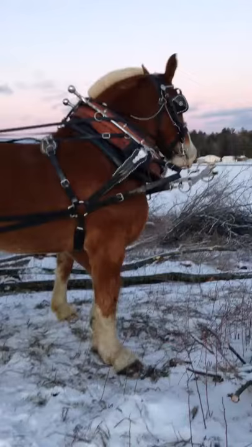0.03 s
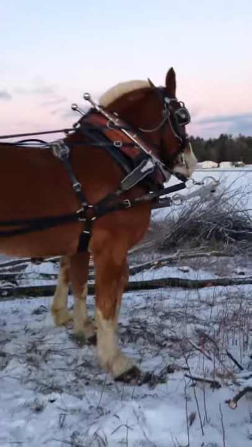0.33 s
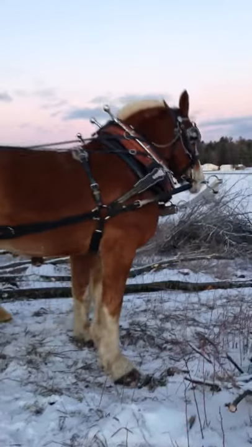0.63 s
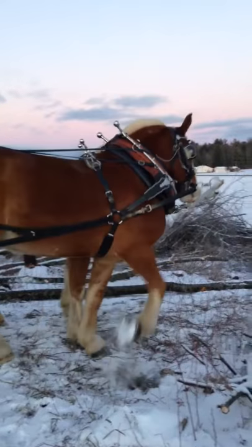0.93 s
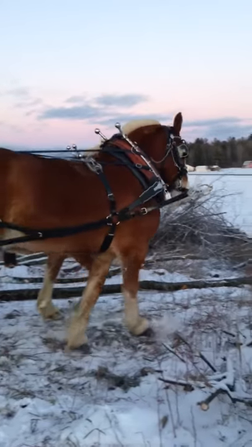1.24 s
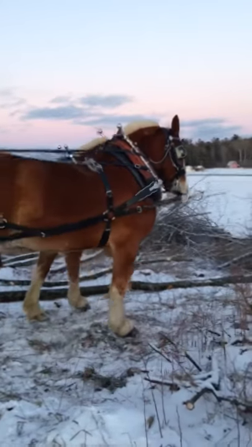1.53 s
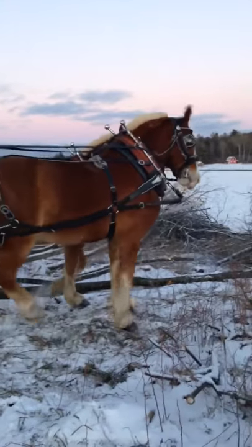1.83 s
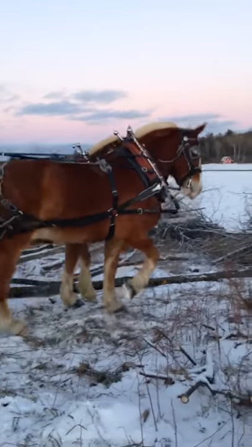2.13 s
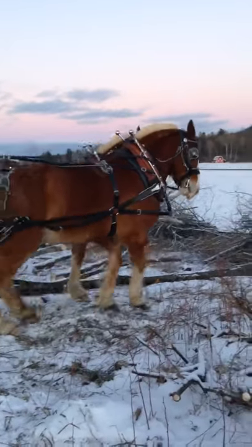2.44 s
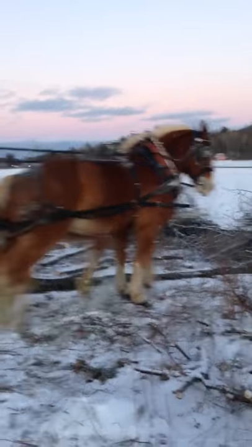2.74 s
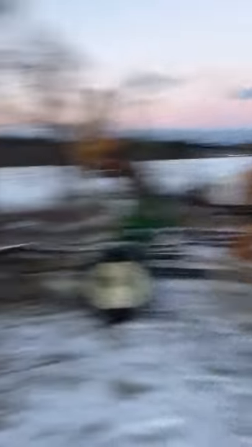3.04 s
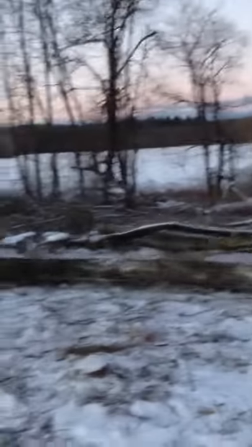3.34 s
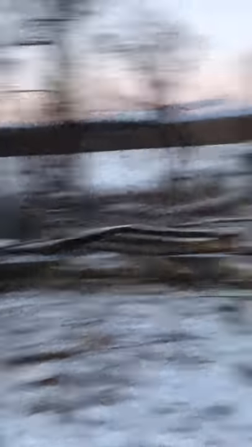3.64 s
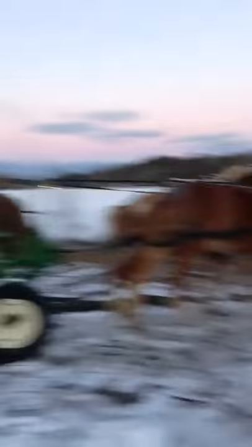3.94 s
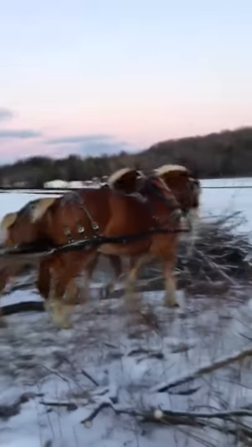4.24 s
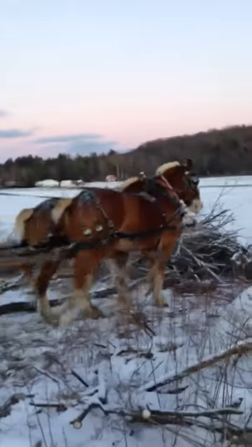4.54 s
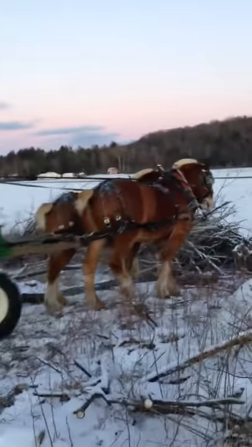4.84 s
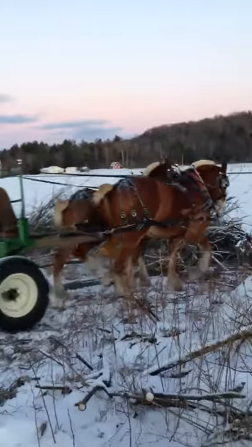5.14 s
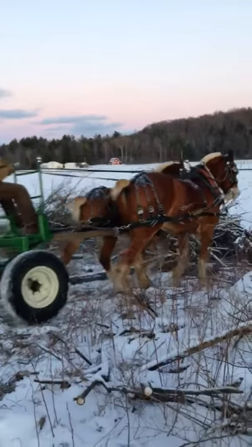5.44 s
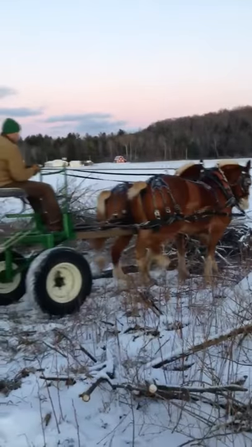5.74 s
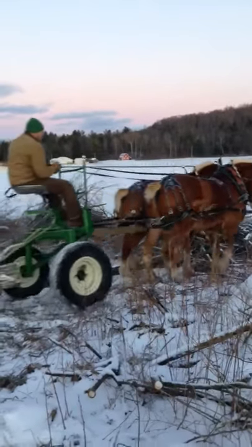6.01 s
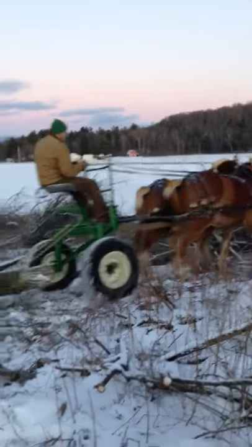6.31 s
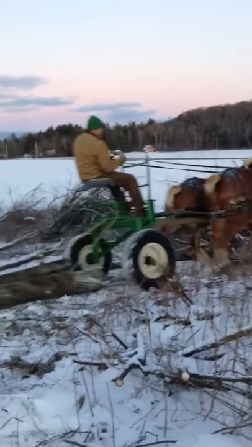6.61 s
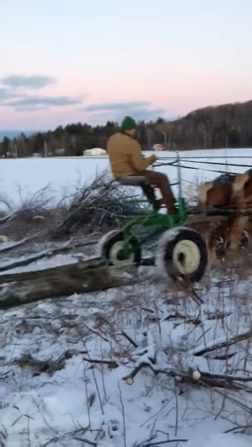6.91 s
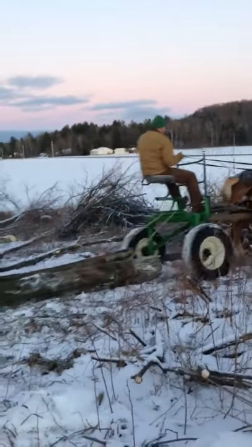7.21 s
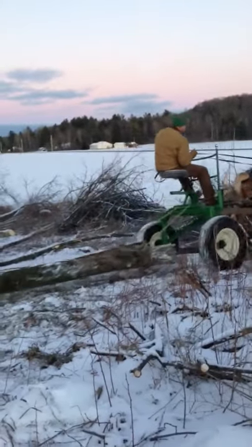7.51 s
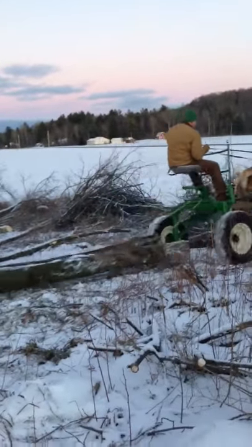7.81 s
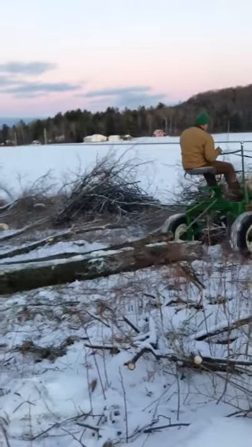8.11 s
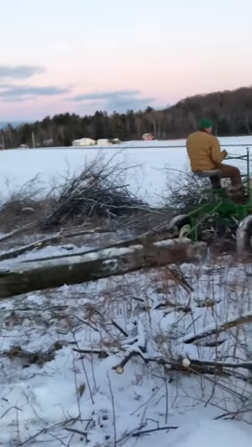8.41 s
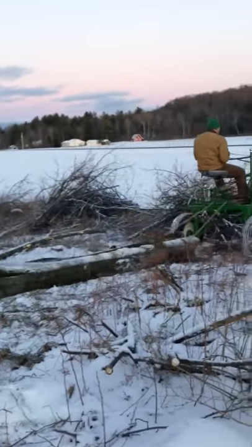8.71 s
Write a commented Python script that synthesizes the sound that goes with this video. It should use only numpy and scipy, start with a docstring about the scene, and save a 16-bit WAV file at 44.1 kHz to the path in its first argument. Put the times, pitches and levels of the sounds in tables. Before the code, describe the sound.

Horses crunch through snow with rattling harness chains, while their cart and log rumble, scrape and crack through dry brush.

```python
"""A team of draught horses walks past in a snowy field, pulling a wheeled cart with a log in tow.
From the start, strides jerk the harness chains taut, steel links rattle on and hooves crunch crusted snow.
From 2 s the load rumbles over frozen ground; near 3.3 s the log scrapes close by with a thin sizzle.
The chains rattle hardest near 4.7 s. Then rumble and rattle ease off, while hooves and wood thud
and twigs keep snapping under the load."""
import sys
import numpy as np
from scipy import signal
from scipy.fft import rfft, irfft, next_fast_len
from scipy.io import wavfile
from scipy.ndimage import uniform_filter1d

SR = 44100
rng = np.random.default_rng(int(sys.argv[2]) if len(sys.argv) > 2 else 0)


def dump(signal):
    """Clip the signal to [-1, 1] and save it as 16-bit WAV at the path in sys.argv[1]."""
    limited = np.clip(np.atleast_2d(signal).T, -1, 1)
    pcm = np.round(limited * 32767).astype(np.int16)
    wavfile.write(sys.argv[1], SR, pcm)


N = 390726
TIME = np.arange(N) / SR

# Modes of a steel link. Each row: frequency in Hz, level in dB, t60 in seconds, spread between links in Hz.
LINK_MODES = [(5072, -4, .16, 45), (5185, -5.5, .1, 110), (5545, -10, .14, 35), (8520, -21, .1, 70),
              (10020, 1, .2, 70), (10912, -6.5, .2, 50), (13465, -7.5, .2, 45), (13850, -10, .16, 120)]
# Chain swings. Each row: time in seconds, rattle level in dB, rattle hold in seconds, jerk level in dB,
# low modes re high modes in dB.
CHAIN_SWINGS = [(0.19, -50.5, 0.054, -48, 4), (0.3, -51, 0.017, -37, 0), (0.36, -33, 0.055, -48, -6.5),
                (0.738, -44.5, 0.011, -37, 0.5), (0.84, -39, 0.026, -29.5, -1), (1.03, -39, .035, -43, 5),
                (1.35, -37, 0.035, -46, -2), (1.459, -33, 0.06, -23, -2.5), (1.602, -32, 0.042, -22, -2.5),
                (1.788, -26, 0.035, -28, -4), (1.85, -28, 0.056, -40, -7), (1.984, -29.5, .05, -27, -0.5),
                (2.174, -25, .01, -24, -3), (2.209, -26, 0.0082, -11.5, -6.5), (2.351, -36, 0.052, -49, 0),
                (2.437, -33.5, 0.152, -23.5, -3.5), (2.619, -30, 0.019, -36, -0.5),
                (2.712, -25, 0.057, -18, -3), (2.852, -27, 0.0166, -27, -5.5), (3.05, -37.5, 0.085, -51, 2),
                (3.21, -32, .29, -33, 4.5), (3.632, -28.5, .06, -39, 0), (3.83, -38, .028, -42, 1),
                (4.44, -37, 0.23, -32, 0), (4.585, -25.5, .1, -27, -2), (4.66, -24, .02, -21, -4),
                (4.693, -17, 0.015, -27, -7), (4.81, -27.5, 0.018, -20, -1), (4.835, -23.5, .008, -21, -5),
                (4.914, -33, 0.0118, -30, -2), (5.188, -28.5, 0.058, -29, -2.5),
                (5.249, -23, 0.015, -18, -5), (5.68, -43, 0.032, -35, 4), (5.998, -35, 0.0672, -30, -0.5),
                (7.02, -44, 0.061, -45, -1), (7.095, -40, .04, -34, -2), (7.27, -43, 0.016, -45, 0),
                (7.391, -46, .09, -47, 5), (8.77, -42.5, 0.089, -31.5, 1)]
LOW_MODES_BELOW_HZ = 7000


def from_db(db):
    """Decibels to gain."""
    return 10 ** (np.asarray(db) / 20)


def rms_one(x):
    """Scale to unit power."""
    return x / np.sqrt(np.mean(x ** 2) + 1e-20)


def as_blow(x):
    """Scale a short sound to the energy of 5 ms at unit power."""
    return x / np.sqrt(np.sum(x ** 2) / (.005 * SR) + 1e-20)


def even(x, span_s):
    """Hold short-term power near 1, keeping the fine grain."""
    power = uniform_filter1d(x ** 2, int(span_s * SR))
    power = uniform_filter1d(np.abs(power), int(span_s * SR / 2))
    return x / np.sqrt(power + np.mean(x ** 2) / 1000)


def gains(rows):
    """Rows of (seconds, dB, ..) to one gain curve per dB column."""
    times_s, *columns = np.transpose(rows)
    return [from_db(np.interp(TIME, times_s, db)) for db in columns]


def add(out, at_s, sound):
    """Mix a sound in at a time."""
    at = max(round(at_s * SR), 0)
    out[at:at + len(sound)] += sound[:N - at]


def swells(events, attack_s, release_s):
    """Power curve of (time s, hold s, dB) events: each rises up to its time, holds, decays."""
    power, t = np.zeros(N), TIME[:SR]
    for at_s, hold_s, db in events:
        shape = np.minimum(t / attack_s, 1) * np.exp(-np.maximum(t - attack_s - hold_s, 0) / release_s)
        add(power, at_s - attack_s, (from_db(db) * shape) ** 2)
    return power


def drift(per_s):
    """Slow random curve, unit RMS."""
    knots = rng.standard_normal(4000)
    return rms_one(np.interp(TIME * per_s, np.arange(len(knots)), knots))


def grains(per_s, spread_db, size=N):
    """Random tiny impacts: many weak, a few strong."""
    strength = from_db(spread_db * np.minimum(rng.exponential(1, size), 5))
    return (rng.random(size) < per_s / SR) * strength * rng.choice([-1, 1], size)


def colour(x, spectrum):
    """Minimum-phase filter through (Hz, dB) points."""
    hz, db = np.transpose(spectrum)
    size = 2 * next_fast_len(len(x) // 2 + 1024)
    grid_hz = np.maximum(np.fft.rfftfreq(size, 1 / SR), 1)
    magnitude = from_db(np.interp(np.log(grid_hz), np.log(hz), db))
    cepstrum = irfft(np.log(magnitude))
    cepstrum[1:size // 2] *= 2
    cepstrum[size // 2 + 1:] = 0
    return irfft(rfft(x, size) * np.exp(rfft(cepstrum)))[:len(x)]


def low_cut(x, hz):
    """Second-order high-pass."""
    return signal.sosfilt(signal.butter(2, hz, "high", fs=SR, output="sos"), x)


def resonance(x, hz, *widths_hz):
    """Band-passes in series, one per width, unit peak gain."""
    for width_hz in widths_hz:
        q = hz / min(width_hz, SR / 3)
        x = signal.lfilter(*signal.iirpeak(hz, q, fs=SR), x + 1e-18)
    return x


def ring(clicks, hz, t60_s):
    """Each click starts a decaying sine of its own height."""
    r, w = from_db(-60 / (t60_s * SR)), 2 * np.pi * hz / SR
    return signal.lfilter([0, np.sin(w)], [1, -2 * r * np.cos(w), r * r], clicks + 1e-18)


def field(x, scatter_db=-15, rise_s=.0017, decay_s=.0081):
    """Brush and snow scatter a short, dull tail."""
    t = TIME[:SR // 4]
    tail = resonance(rng.standard_normal(len(t)), 980, 16000)
    tail = tail * np.exp(-t / decay_s) * (1 - np.exp(-t / rise_s))
    tail /= np.sqrt(np.sum(tail ** 2))
    return x + from_db(scatter_db) * signal.oaconvolve(x, tail)[:N]


def with_steps(steady, layer):
    """A horse treads down and the load surges: the layer's gain swells at each step."""
    # Each row: time in seconds, hold in seconds, then rumble, crush and crackle levels in dB.
    steps = [(0.263, 0.12, -56, -49.5, -50), (0.584, 0.092, -58, -52.5, -42), (0.877, 0.13, -54, -39, -39),
             (1.446, 0.011, -59, -37, -32), (1.602, 0.021, -50, -36, -44), (1.943, 0.1, -34.5, -33.5, -35),
             (2.62, 0.12, -28.5, -55, -54), (3.205, 0.17, -29.5, -47, -27.5), (4.077, 0.089, -28, -41, -60),
             (4.217, 0.17, -27.5, -39, -56), (4.47, 0.075, -35, -48, -37), (4.639, 0.028, -39, -39, -31),
             (4.835, 0.051, -37, -49, -32), (5.464, 0.036, -41.5, -42.5, -42),
             (5.904, 0.17, -35.5, -52, -37.5), (6.24, 0.18, -36.5, -40, -37.5),
             (6.625, 0.15, -38, -38, -37), (6.948, 0.058, -45, -43, -35), (8.655, 0.069, -34, -55, -49)]
    column = ("rumble", "crush", "crackle").index(layer)
    events = [(at_s, hold_s, levels_db[column]) for at_s, hold_s, *levels_db in steps]
    return np.sqrt(steady ** 2 + swells(events, attack_s=.028, release_s=.015))


def rumble(uneven_db=2.3):
    """Dense bumps on frozen ground shake the load's low resonances; uneven ground varies the level."""
    # Each row: time in seconds, level in dB.
    drag_curve = [(0.25, -60), (0.58, -69), (0.99, -52.5), (1.35, -60.5), (2.02, -37), (2.84, -26),
                  (3.19, -30), (3.62, -37.5), (4.22, -28), (4.7, -40), (5.2, -41), (5.38, -43.5),
                  (5.76, -44), (6.24, -39), (6.8, -43.5), (7.45, -46.5), (7.92, -47), (8.16, -41),
                  (8.51, -46.5), (8.85, -40)]
    # Each row: frequency in Hz, width in Hz, level in dB.
    load_modes = [(188, 25, 3.5), (234.3, 39, 7.5), (300, 40, 0.5)]
    level = with_steps(gains(drag_curve)[0], "rumble")
    out = 0
    for hz, width_hz, db in load_modes:
        bumps = grains(1500, spread_db=2)
        out += from_db(db) * rms_one(resonance(bumps, hz, width_hz, 2.6 * width_hz))
    return level * from_db(1.5 + uneven_db * drift(per_s=22)) * even(out, span_s=.16)


def clods(per_s=330, t60_cycles=12, count=26):
    """Frozen lumps and sticks knock together, each at its own pitch."""
    pitches_hz = np.geomspace(380, 2300, count) * rng.uniform(.97, 1.03, count)
    return rms_one(sum(ring(grains(per_s / count, spread_db=3.5), hz, t60_cycles / hz) * hz ** .9
                       for hz in pitches_hz))


def ticks(per_s=240, t60_cycles=7, count=14):
    """Dry stalks break singly, each with a very short ring."""
    return rms_one(sum(ring(grains(per_s / count, spread_db=3.6), hz, t60_cycles / hz)
                       for hz in np.geomspace(2800, 11000, count)))


def brush():
    """Under wheels and log, snow packs and stalks break in clumps of fractures over a sliding hiss."""
    # Each row: time in seconds, snow crush in dB, stalk crackle in dB.
    slide_curve = [(0.15, -56, -51.5), (0.3, -54, -57), (0.5, -55, -52.5), (0.8, -56.5, -55),
                   (1.1, -52.5, -47), (1.35, -49, -50), (1.47, -46.5, -39), (1.61, -50.5, -42),
                   (1.97, -46, -45), (2.12, -37.5, -40), (2.55, -39, -39.5), (3.19, -30.5, -33.5),
                   (3.31, -32, -30.5), (3.64, -37, -38.5), (3.95, -40.5, -41.5), (4.38, -37, -38.5),
                   (5.12, -41, -36.5), (5.29, -43.5, -40.5), (5.65, -41.5, -44), (6.22, -40, -42.5),
                   (6.53, -35.5, -38), (7.2, -42.5, -37), (7.7, -43, -39.5), (7.85, -45, -47),
                   (8.09, -45.5, -49.5), (8.2, -41.5, -39.5), (8.54, -47, -43), (8.85, -41.5, -38.5)]
    # Spectra. Each row: frequency in Hz, density in dB.
    snow_spectrum = [(30, -31), (65, -40), (120, -3), (330, 3.5), (500, 0), (950, 1), (1500, -3),
                     (2200, -4), (4000, -15), (15000, -27)]
    stalk_spectrum = [(100, -83), (700, -42), (1500, 3), (2300, -2), (3600, 5.5), (5000, 3.5), (6500, 2),
                      (9000, 3.5), (12000, 0.5), (15000, -6)]
    crush_gain, crackle_gain = gains(slide_curve)
    crush_gain = from_db(1.2) * with_steps(crush_gain, "crush")
    crackle_gain = from_db(.5) * with_steps(from_db(2.5) * crackle_gain, "crackle")
    snow = rms_one(grains(2500 * from_db(4.4 * drift(per_s=70)), spread_db=1))
    stalks = rms_one(grains(3000 * from_db(7 * drift(per_s=90)), spread_db=2))
    crush = colour(snow + .5 * rng.standard_normal(N) + .26 * clods(), snow_spectrum)
    crackle = rms_one(colour(stalks + .7 * rng.standard_normal(N), stalk_spectrum)) + .5 * ticks()
    return crush_gain * even(crush, span_s=.3) + crackle_gain * even(crackle, span_s=.33)


def sizzle():
    """Narrow, very high tones swell and fade as the load passes closest."""
    # Each row: time in seconds, level in dB.
    sizzle_curve = [(3.0, -64), (3.12, -47), (3.23, -28), (3.32, -25), (3.42, -37), (3.5, -54), (3.6, -75)]
    # Each row: frequency in Hz, width in Hz, level in dB.
    bands = [(14100, 61, 1), (14400, 110, -3), (15230, 50, -13)]
    tones = sum(from_db(db) * rms_one(resonance(rng.standard_normal(N), hz, width_hz, 2 * width_hz))
                for hz, width_hz, db in bands)
    return gains(sizzle_curve)[0] * rms_one(tones)


def scrape():
    """Bark catches and slips on the ground; the log rasps."""
    # Each row: time in seconds, level in dB.
    rasp_curve = [(2.85, -70), (3.12, -36), (3.24, -25.5), (3.33, -22.5), (3.42, -25), (3.52, -33),
                  (3.75, -66)]
    # Each row: frequency in Hz, width in Hz, level in dB.
    wood_modes = [(1420, 240, -1.5), (2300, 800, 0), (3300, 900, 1)]
    slips = grains(1500, spread_db=1)
    rasp = sum(from_db(db) * rms_one(resonance(slips, hz, width_hz)) for hz, width_hz, db in wood_modes)
    return gains(rasp_curve)[0] * rms_one(rasp)


def thuds():
    """Heavy, soft blows of hooves and wood on frozen ground shake a low resonance."""
    # Each row: start in seconds, level in dB, pitch in Hz, decay in seconds.
    blows = [(0.1, -35.5, 201, 0.0054), (2.439, -27, 142, 0.014), (3.427, -16.5, 274, 0.0015),
             (4.041, -16, 226, 0.013), (4.858, -19.5, 320, 0.017), (5.12, -26.5, 200, 0.015),
             (5.472, -24, 252, 0.028), (6.02, -25.5, 245, .02), (6.217, -24.5, 393, 0.025),
             (6.31, -26, 215, 0.016), (6.621, -33, 182, 0.014), (6.765, -23.5, 404, 0.014),
             (6.972, -22, 345, 0.016), (7.155, -24, 345, 0.022), (7.74, -27.5, 173, 0.023),
             (7.802, -23, 343, 0.012), (7.973, -24, 317, 0.019), (8.647, -25, 265, 0.02)]
    out, t = np.zeros(N), TIME[:SR // 5]
    for start_s, db, hz, decay_s in blows:
        push = rng.standard_normal(len(t)) * np.exp(-t / decay_s)
        add(out, start_s, from_db(db - 1) * as_blow(resonance(push, hz, .25 * hz, 10 * hz)))
    return out


def crunches_and_scuffs(rise_s=.00047):
    """Short, dying gritty bursts: low crunches of snow crust and bright scuffs of the harness."""
    # Each row: start in seconds, level in dB, decay in seconds, pitch in Hz.
    bursts = [(0.868, -34, 0.01, 2450), (0.901, -25, 0.014, 4500), (0.974, -25.5, 0.012, 1870),
              (1.022, -31, 0.014, 880), (1.162, -28.5, 0.037, 7950), (1.451, -24.5, 0.0062, 2460),
              (1.596, -23, 0.007, 1707), (1.965, -22.5, 0.013, 3230), (2.186, -21.5, 0.034, 7500),
              (2.287, -21, 0.0091, 8600), (2.617, -17, 0.012, 8320), (2.690, -18.5, 0.0057, 7495),
              (3.167, -19, 0.012, 670), (4.042, -21, .008, 800), (4.212, -29.5, 0.04, 3250),
              (4.439, -25, 0.016, 6400), (4.646, -26, 0.018, 7500), (4.922, -32, .016, 950),
              (5.156, -20, 0.0027, 1540), (5.472, -20.5, 0.0025, 4160), (5.652, -29.5, .016, 950),
              (5.744, -31.5, .008, 1200), (5.923, -19, 0.035, 2930), (6.432, -27.5, 0.0099, 750),
              (6.657, -29, .008, 1100), (6.683, -25, 0.0095, 1200), (6.752, -29, 0.015, 1040),
              (7.404, -31, 0.12, 2030), (8.643, -21, 0.012, 990), (8.685, -20, 0.01, 1480)]
    out, t = np.zeros(N), TIME[:SR // 4]
    for start_s, db, decay_s, hz in bursts:
        grit = grains(3000, spread_db=1.5, size=len(t))
        burst = rms_one(resonance(grit, hz, .71 * hz, 9.7 * hz))
        envelope = np.exp(-t / decay_s) * (1 - np.exp(-t / rise_s))
        add(out, start_s, from_db(db) * burst * envelope)
    return out


def twig_ring(force, hz, q, edge_db=-6):
    """A fracture rings at the twig's pitch; some raw force stays as a sharp edge."""
    ringing = as_blow(resonance(force, hz, hz / q, 2 * hz / q))
    return as_blow(ringing + from_db(edge_db) / q * force)


def snaps(crack_s=.00028, splinter_s=.0062, knock_s=.007, stick_width_hz=140):
    """A twig cracks, a few fibres follow, and the wood knocks and rings two octaves below the crack."""
    # Each row: start in seconds, crack level in dB, pitch in Hz, Q, splinters re crack in dB, knock in dB.
    twigs = [(.099, -20.5, 4070, 0.85, -1, -50), (.9565, -13, 9100, 1.1, -4, -58),
             (.181, -24.5, 3400, 1.9, 0, -44.5), (.233, -8.5, 3700, 0.32, -1, -31),
             (0.3355, -8.5, 4260, 2, -1, -35), (0.3419, -5, 3380, 1.3, -4, -30.5),
             (.653, -16, 3530, 0.71, -1, -25), (1.1785, -8, 8500, .7, 1, -51),
             (1.733, -14.5, 5400, 0.68, 2, -45), (2.505, -11.5, 9000, 2.4, 5, -42),
             (3.424, -10, 3110, 0.9, -10, -21.5), (3.871, -14, 4050, 0.4, -8, -30.5),
             (4.043, -10, 5800, 0.69, -1.5, -24.5), (4.412, -14.5, 13030, 2.5, 4, -38),
             (4.753, -10, 1770, 1.8, 0, -35), (4.79, -12, 4530, 0.56, 4, -25.5),
             (4.9446, -5.5, 4450, 3.9, -4, -29), (5.0578, -5.5, 4170, 3, -13, -48),
             (5.1117, -3.5, 6440, 1, -0.5, -27.5), (5.164, -12.5, 5070, 0.61, 4, -38),
             (5.815, -11, 4660, 1.3, -20, -49), (5.914, -2, 3430, 0.42, 6, -23.5),
             (6.377, -3.5, 4900, 1.4, -3.5, -26), (6.397, -10.5, 6630, 1, -1, -27),
             (6.4535, -12.5, 3500, 5.7, -3, -41), (6.481, -10.5, 4100, 0.75, -5, -33),
             (6.619, -9.5, 7000, 0.58, 3, -20.5), (6.7035, -7, 7000, 0.62, -12, -26),
             (6.9118, -6, 4900, 1.3, -2, -49), (6.977, -12, 3600, 1.2, -1, -29),
             (6.9875, -10.5, 4840, 0.7, -10, -36), (7.02, -15, 4970, 0.77, -3, -28.5),
             (7.269, -9.5, 7100, 1.4, -4, -35), (7.318, -9, 2180, 0.81, -1.5, -46),
             (7.7993, -6, 1230, 1.7, 2, -20), (7.802, 0.5, 4340, 1.3, -9, -34),
             (7.852, -16, 2900, 0.58, 2, -39), (7.861, -15, 2600, 1, -11, -37.5),
             (8.0412, -4, 3940, 2.4, -9, -27), (8.048, -4.5, 3800, 0.4, -3, -34),
             (8.076, -16, 2270, 0.89, 0, -40), (8.1014, 0.5, 3850, 1.1, -11, -26),
             (8.1185, 0.5, 3100, 0.57, -4, -22), (8.123, -2.5, 3420, 0.35, -17, -22.5),
             (8.156, -6.5, 3000, 0.65, 1.5, -24.5), (8.23, -13, 4160, 1.4, -13, -34),
             (8.322, -9, 3740, 1.4, -8, -29), (8.3323, -16.5, 3760, 1.2, -7, -31),
             (8.4077, -8.5, 2500, 4.2, -17, -26.5), (8.6805, -11, 4500, 0.68, -8, -28),
             (8.6909, -2, 4300, 1.3, -17, -23)]
    # Each row: frequency in Hz, density in dB.
    knock_spectrum = [(40, -58), (120, -3), (300, 13.5), (900, 13), (1500, 10.5), (2300, 7), (5000, -38),
                      (15000, -43)]
    out, t = np.zeros(N), TIME[:SR // 16]
    for start_s, crack_db, hz, q, splinters_db, knock_db in twigs:
        split = rng.standard_normal(len(t)) * np.exp(-t / crack_s)
        fibres = grains(3000, spread_db=0, size=len(t)) * np.exp(-t / splinter_s)
        crack = twig_ring(as_blow(low_cut(split, 570)), hz, q)
        splinters = from_db(splinters_db) * twig_ring(as_blow(low_cut(fibres, 700)), hz, q)
        knock = colour(rng.standard_normal(len(t)) * np.exp(-t / knock_s), knock_spectrum)
        stick = resonance(knock, hz / 4, stick_width_hz)
        wood = as_blow(as_blow(knock) + .4 * as_blow(stick))
        add(out, start_s, from_db(crack_db - 15.5) * (crack + splinters) + from_db(knock_db) * wood)
    return out


def squeaks():
    """Harness or rubbed wood slips under load and sings briefly."""
    # Each row: centre in seconds, level in dB, pitch in Hz, half-length in seconds.
    slips = [(0.634, -32, 6430, .04), (0.7, -33, 6730, 0.005), (0.872, -30, 6440, 0.016),
             (1.138, -36, 6600, 0.03), (1.277, -33, 6560, 0.01), (3.326, -27, 1430, 0.073),
             (3.412, -24, 2290, .025)]
    out = np.zeros(N)
    for centre_s, db, hz, half_s in slips:
        swell = np.hanning(int(2 * half_s * SR)) ** 2
        add(out, centre_s - half_s, from_db(db) * swell * np.sin(2 * np.pi * hz * TIME[:len(swell)]))
    return out


def links(contacts, hz, t60_s, spread_hz, uneven_db=8, count=9):
    """One mode of all links, most alike, a few off size; each contact hits one link at random strength."""
    at = np.flatnonzero(contacts)
    struck_link = rng.integers(0, count, len(at))
    ranks = np.linspace(-1, 1, count)
    out = 0
    for link, detune in enumerate(ranks * np.abs(ranks)):
        hits = at[struck_link == link]
        clicks = np.zeros(len(contacts))
        clicks[hits] = contacts[hits] * from_db(uneven_db * rng.standard_normal(len(hits)))
        out += ring(clicks, hz + spread_hz * detune, t60_s)
    return out


def jerks(run_s=.0084, damping=2):
    """A jerk runs down the chain in a quick flurry; taut links press together and ring briefly."""
    out, t = np.zeros(N), TIME[:SR // 6]
    for at_s, _, _, jerk_db, low_db in CHAIN_SWINGS:
        flurry = grains(5000, spread_db=4, size=len(t)) * np.sin(np.pi * t / run_s) * (t < run_s)
        for hz, db, t60_s, spread_hz in LINK_MODES:
            gain = from_db(jerk_db + db + low_db * (hz < LOW_MODES_BELOW_HZ))
            add(out, at_s - run_s / 2, gain * as_blow(links(flurry, hz, t60_s / damping, spread_hz)))
    return out


def shaking(low, idle_low_db=6.5):
    """Gain of the low or high link modes: swings over a gentle jingle that favours the low ones."""
    # Each row: time in seconds, level in dB.
    idle_curve = [(0.1, -65.5), (1.3, -56.5), (1.6, -46), (3.5, -45), (4.15, -56.5), (4.7, -43), (5.5, -57),
                  (7.2, -52.5), (7.9, -61.5), (8.85, -57.5)]
    idle = gains(idle_curve)[0] * from_db(idle_low_db * low)
    events = [(at_s, hold_s, db + low_db * low) for at_s, db, hold_s, _, low_db in CHAIN_SWINGS]
    return np.sqrt(idle ** 2 + swells(events, attack_s=.016, release_s=.021))


def chains(peak_contacts_per_s=1100, flurry_db=1.2):
    """Shaken links collide more often and harder, in uneven flurries; each contact scuffs and rings."""
    # Steel on steel. Each row: frequency in Hz, density in dB.
    scuff_spectrum = [(200, -70), (1500, -43), (3000, 1), (4500, -7), (6500, 1.5), (8200, 8.5), (9500, -3),
                      (11200, 14), (12400, -13), (15000, -6.5)]
    shake, low_shake = shaking(low=False), shaking(low=True)
    contacts = grains(peak_contacts_per_s * np.sqrt(shake / shake.max()), spread_db=1.5)
    jingle = 0
    for hz, db, t60_s, spread_hz in LINK_MODES:
        drive = low_shake if hz < LOW_MODES_BELOW_HZ else shake
        jingle += drive * from_db(db) * even(links(contacts, hz, t60_s, spread_hz), span_s=.07)
    friction = .8 * rms_one(contacts) + rms_one(grains(7000, spread_db=4.5))
    scuff = shake * even(colour(friction, scuff_spectrum), span_s=.053)
    flurry = from_db(flurry_db * drift(per_s=140))
    return flurry * (from_db(.9) * jingle + from_db(-6.5) * scuff)


def scene():
    """Harness, load and ground heard from beside the track."""
    harness = low_cut(chains() + jerks() + squeaks(), 600)
    ground = rumble() + scrape() + brush() + thuds() + sizzle()
    transients = field(low_cut(snaps() + crunches_and_scuffs(), 150))
    return (harness + ground + transients)[None]


def gain_control(x, threshold_db=-17, slope=.62, release_db_per_s=28, attack_s=.035):
    """Loud moments turn the gain down; it creeps back up."""
    level_db = 10 * np.log10(np.abs(uniform_filter1d(x ** 2, SR // 100)) + 1e-12)
    over_db = np.maximum(level_db - threshold_db, 0)
    release_db = release_db_per_s * TIME
    held_db = np.maximum.accumulate(over_db + release_db) - release_db
    pole = np.exp(-1 / (attack_s * SR))
    return x * from_db(-slope * signal.lfilter([1 - pole], [1, -pole], held_db))


def record(dry, silent_s=.08, fade_s=.006, low_cut_hz=85, high_cut_hz=15250):
    """Brief opening silence, then gain control, clipping, bass cut and a steep top cut."""
    opened = dry[0] * np.clip((TIME - silent_s) / fade_s, 0, 1)
    clipped = np.clip(gain_control(opened), -1, 1)
    high_cut = signal.ellip(12, .3, 80, high_cut_hz, fs=SR, output="sos")
    return signal.sosfilt(high_cut, low_cut(clipped, low_cut_hz))[None]


dry = scene()
out = record(dry)
dump(out)
```